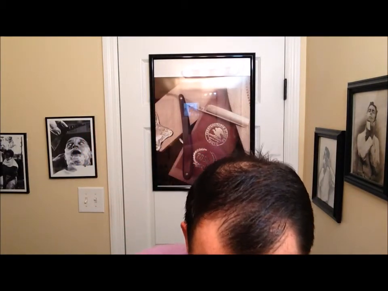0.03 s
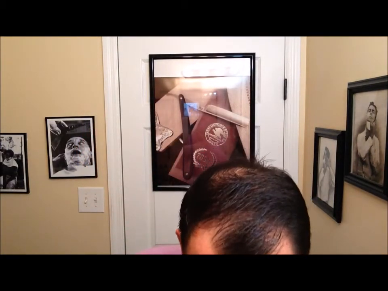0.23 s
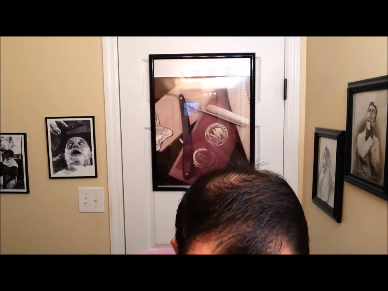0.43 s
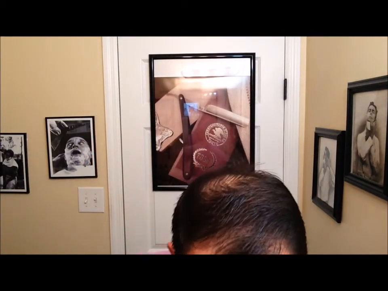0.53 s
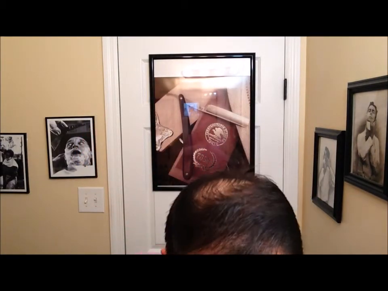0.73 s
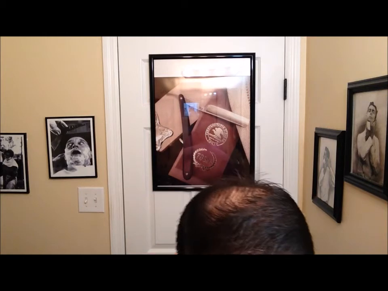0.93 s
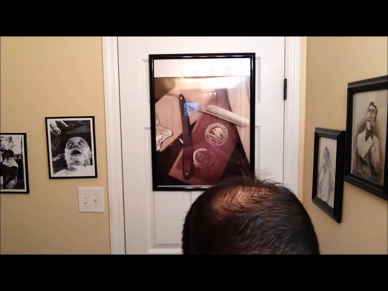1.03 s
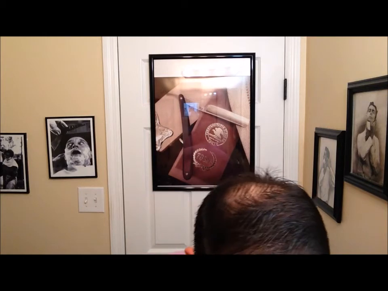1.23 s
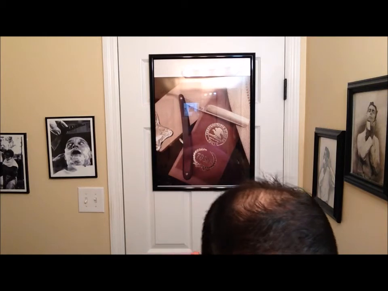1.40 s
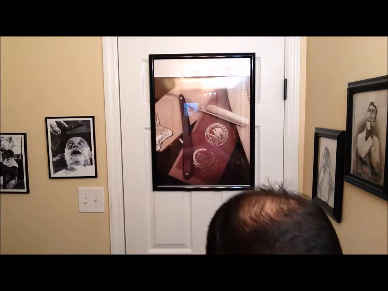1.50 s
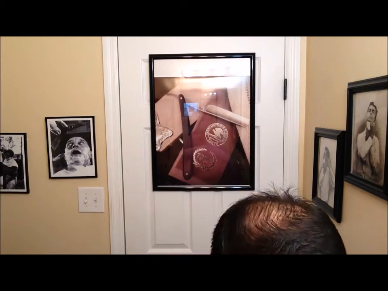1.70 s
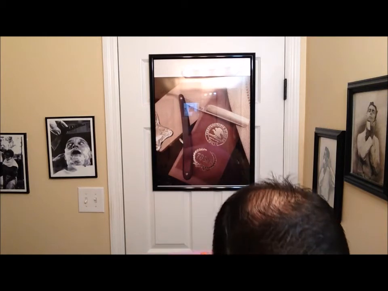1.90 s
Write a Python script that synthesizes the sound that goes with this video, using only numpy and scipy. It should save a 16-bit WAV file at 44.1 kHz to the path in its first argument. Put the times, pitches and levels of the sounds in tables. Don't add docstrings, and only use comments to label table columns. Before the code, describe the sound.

Hard shaving gear knocks at a bathroom sink, a mug set down, razor clinking, water drips

```python
import sys
import numpy as np
from scipy import signal
from scipy.fft import rfft, irfft, next_fast_len
from scipy.io import wavfile
from scipy.ndimage import uniform_filter1d, map_coordinates

SR = 44100
rng = np.random.default_rng(int(sys.argv[2]) if len(sys.argv) > 2 else 0)


def log_audio(samples):
    frames = np.atleast_2d(samples).T
    limited = np.clip(frames, -1, 1)
    pcm = np.round(limited * 32767).astype(np.int16)
    wavfile.write(sys.argv[1], SR, pcm)


def ratio(d):
    e = np.asarray(d, float) / 20
    return 10 ** e


N = 85995

# pitch_hz, t60_s
ROOM = [(100, 0.34), (400, 0.51), (1000, 0.5), (2500, 0.37), (5000, 0.34), (15000, 0.24)]


def unit(x):
    return x / np.sqrt(np.mean(x ** 2) + 1e-20)


def along(points, hz):
    f, v = np.transpose(points)
    return np.interp(np.log(hz + 1), np.log(f + 1), v)


def filtered(x, response):
    m = next_fast_len(len(x) + SR // 4)
    return irfft(rfft(x, m) * response(np.fft.rfftfreq(m, 1 / SR)), m)[:len(x)]


def coloured_noise(colour, n):
    return unit(filtered(rng.standard_normal(n), lambda hz: ratio(along(colour, hz))))


def wander(knots, rate_hz):
    return map_coordinates(rng.standard_normal(knots), [np.arange(N) * rate_hz / SR])


def envelope(points):
    s, db = np.transpose(points)
    return ratio(np.interp(np.arange(N) / SR, s, db))


def add(track, s, sound):
    part = track[round(s * SR):][:len(sound)]
    part += sound[:len(part)]


def tail(colour, hold_s=0, build_cycles=0):
    noise = coloured_noise(colour, SR)
    hz, t, z = signal.stft(noise, SR, nperseg=256)
    fall = ratio(-60 * np.maximum(t - hold_s, 0) / along(ROOM, hz)[:, None])
    grow = 1 - np.exp(-np.outer(hz + 50, t + 0.0052) / (build_cycles + 1e-6))
    return signal.istft(z * fall * grow, SR, nperseg=256)[1][:SR]


def roomy(sound, room_db):
    answer = tail([(100, 0)])
    answer = answer / np.linalg.norm(answer)
    return sound + ratio(room_db) * signal.fftconvolve(sound, answer)[:len(sound)]


def ring(modes, build_cycles=2):
    scatter_cycles, scatter_rate_hz, scatter_per_hz = 75, 8, .038
    t, out = np.arange(SR) / SR, 0
    for hz, db, t60_s in modes:
        clear = np.exp(-t * hz / scatter_cycles)
        position = t * (scatter_rate_hz + scatter_per_hz * hz)
        a, b = (map_coordinates(knots, [position]) for knots in rng.standard_normal((2, 500)))
        scattered = np.sqrt((1 - clear ** 2) / 2) * (a + 1j * b)
        line = np.imag(np.exp(2j * np.pi * hz * t) * (clear + scattered))
        decay = ratio(db - 60 * t / min(t60_s, along(ROOM, hz)))
        out = out + decay * (1 - np.exp(-t * hz / build_cycles)) * line
    return out


def floor():
    # pitch_hz, level_db_per_hz
    floor_colour = [(40, -27.5), (100, 1), (180, -0.5), (400, -6.5), (1000, -11), (2500, -15.5),
                    (6000, -15), (15500, -15)]
    return ratio(-69.5) * coloured_noise(floor_colour, N)


def trickle():
    # start_s, flow_db
    flow = [(0, -70.5), (.2, -68), (.42, -70.5), (.5, -64), (.6, -70.5), (.68, -74), (.9, -72.5),
            (1.562, -82.5), (1.598, -62.5), (1.66, -54.5), (1.69, -64), (1.95, -90)]
    # pitch_hz, level_db_per_hz
    fizz = [(1500, -38), (3000, -10), (5000, -8), (8000, -11.5), (12000, -8), (15500, -15)]
    spikes = ratio(1.5 * wander(600, 250)) * rng.standard_normal(N)
    return envelope(flow) * unit(filtered(spikes, lambda hz: ratio(along(fizz, hz))))


def drops():
    # start_s, level_db, pitch_hz, life_cycles
    plinks = [(.089, -39, 3850, 6), (.1754, -38, 9770, 8), (.1765, -51, 13400, 5), (.5, -53, 9900, 14),
              (.4995, -55.5, 12600, 4), (.554, -57, 7400, 6), (.584, -54, 7600, 3), (.595, -57, 7400, 4),
              (.877, -48, 12800, 8), (.948, -50, 11300, 8), (1.092, -64, 4800, 8), (1.1708, -48, 6670, 4),
              (1.796, -45.5, 2680, 13), (1.885, -55, 2600, 10), (1.925, -60, 2650, 12),
              (1.944, -56, 2450, 14), (1.942, -55, 3680, 25), (1.935, -61, 3050, 25),
              (1.855, -62, 4330, 25)]
    glide, room_db = .04, -1
    out, t = np.zeros(N), np.arange(SR // 3) / SR
    for s, db, hz, life_cycles in plinks:
        u = t * hz / life_cycles
        phase = 2 * np.pi * hz * t * (1 + glide * np.minimum(u, 2))
        tone = np.sin(phase) * u * np.exp(1 - u * 3) * 3
        add(out, s, ratio(db) * roomy(tone, room_db))
    return out


def chain():
    # pitch_hz, level_db, t60_s
    chink = [(8330, -67, 0.08), (9970, -63.5, 0.11), (11130, -61, 0.094)]
    out = np.zeros(N)
    add(out, 1.814, roomy(ring(chink), 3))
    return out


def slide():
    # start_s, pressure_db
    pressure = [(0, -47), (.08, -50), (0.189, -52), (0.211, -55), (0.237, -39), (.3, -100), (1.7, -100),
                (1.78, -88), (1.85, -62.5), (1.95, -64.5)]
    # pitch_hz, width_hz, level_db
    resonances = [(255, 35, 2.5), (602, 120, -4.5), (887, 7.1, 4.5), (1320, 70, -1.5), (1966, 41, -17.5),
                  (2390, 160, -11), (3000, 45, -34.5), (3590, 34, -5), (3870, 150, -17), (4630, 170, -20.5)]
    # pitch_hz, level_db_per_hz
    bed_colour = [(60, -56.5), (150, -32.5), (250, -16), (600, 0), (1500, -13), (4000, -18), (6000, -31.5),
                  (15500, -41)]
    cut_hz, grit_db, bed_db = 210, 1.7, -4.5

    def body(f):
        total = 0
        for k, (centre_hz, width_hz, db) in enumerate(resonances):
            damping = 1j * f * width_hz
            total = total + (-1) ** k * ratio(db) * damping / (centre_hz * centre_hz - f * f + damping)
        return f ** 4 / (f ** 4 + cut_hz ** 4) * total

    grit = ratio(grit_db * wander(200, 70)) * rng.standard_normal(N)
    bed = coloured_noise(bed_colour, N)
    return envelope(pressure) * (unit(filtered(grit, body)) + ratio(bed_db) * bed)


def rocking():
    # middle_s, level_db, pitch_hz, length_s
    touches = [(0.088, -46, 1304, 0.038), (0.255, -26, 421.4, 0.053), (0.285, -25.5, 957, 0.044),
               (.36, -36, 1530, .05), (.36, -35, 498.4, 0.052), (0.419, -38, 1345, .03),
               (.222, -48, 186, .04), (.81, -55.5, 2817, .02), (.232, -23.5, 1465, .015),
               (1.265, -55.5, 1506, 0.017), (1.269, -59.5, 1850, 0.021), (1.4, -61.5, 171, 0.11),
               (1.48, -60.5, 242, 0.0297), (1.477, -67.5, 1260, 0.022), (1.594, -50, 1244, 0.016),
               (1.61, -32, 1065, 0.0147), (1.655, -35.5, 102, .06), (1.76, -41.5, 230, 0.065),
               (0.325, -34, 427, 0.028), (.4, -40.5, 322, 0.043), (0.628, -65, 224, 0.12),
               (1.317, -48, 292.8, 0.058), (1.614, -41, 3137, .02), (1.624, -37.5, 3720, 0.027),
               (1.923, -52, 236, 0.076), (0.801, -38.5, 397, .025), (0.867, -50.5, 328, .05),
               (0.935, -53.5, 514, 0.023), (0.94, -60, 1022, 0.018), (1.271, -48, 417.5, .03),
               (1.305, -47, 414, .025), (1.337, -56, 709, 0.027), (1.35, -54.5, 462, 0.0253),
               (1.51, -58, 398, 0.034), (1.632, -42.5, 503, 0.028), (1.655, -36.5, 1273, .02),
               (1.683, -35, 718, 0.022), (1.85, -54, 514, 0.033), (1.866, -50.5, 287, .03),
               (1.936, -50, 406, .035)]
    # middle_s, level_db, pitch_hz, length_s
    razor_beats = [(.718, -31, 305, .04), (.746, -28.5, 308, .032), (.775, -38, 300, .035)]
    out, t = np.zeros(N), np.arange(SR // 10) / SR
    for s, db, hz, length_s in [*touches, *razor_beats]:
        swell = np.sin(np.pi * np.minimum(t / length_s, 1)) ** 2
        add(out, s - length_s / 2, ratio(db) * swell * np.sin(2 * np.pi * hz * t))
    return roomy(out, -10)


def knocks():
    knock_s = [
        .2287,
        .6896,
        1.136,
        1.2605,
        1.468,
        1.587,
        1.6055,
    ]
    # level_db, rise_s, hold_s, ring_over_thud_db, build_cycles (to fill the room)
    contacts = [(-23, 0.00046, 0.04, -6, 0.54), (-34.5, 0.00064, 0.00525, -1.5, 6.7),
                (-63, 0.0092, 0.05, -17, 1.4), (-47.5, 0.0022, 0.01, 2, 3.9), (-59, 0.0031, 0.009, 6, 2.4),
                (-39, 0.017, 0.024, 4.5, 1.1), (-30.5, 0.0017, 0.035, -3, 3.6)]
    cracks_db = [-31, 6.5, -34, -22, -22, -28, -29]
    # pitch_hz, level_db_per_hz
    mug = [(60, -36), (200, -2.5), (450, -1), (1000, -2), (2600, -13.5), (3300, -27.5), (4600, -41.5),
           (15500, -56)]
    razor = [(60, -28), (150, -3.5), (310, -1.5), (700, -6), (1300, -10), (2200, -14), (5000, -20.5),
             (15500, -24.5)]
    nudge = [(60, 2), (150, 10), (350, 3), (700, -45), (1500, -43), (15000, -59)]
    soft = [(60, -1.5), (170, 1), (350, 7), (800, -2), (1900, -27), (2200, -23), (15000, -57)]
    tap = [(60, -5), (230, -2), (450, -11), (800, -31), (1300, -16.5), (1800, -55), (15000, -51)]
    graze = [(150, -9.5), (350, 4.5), (1300, -21), (3000, -21.5), (8000, -42)]
    bowl = [(60, -17), (110, -2.5), (466, -3.5), (900, -11.5), (2250, -19.5), (3300, -13.5), (4500, -27),
            (15500, -48)]
    # pitch_hz, level_db, t60_s
    mug_ring = [(188, -7.5, 0.34), (425, 2, 0.25), (506, 2, .3), (748, 1, 0.32), (964, 7, 0.2),
                (1090, -2, .19), (1570, 6, 0.09), (1415, 9, 0.12), (1960, -4, 0.25), (2240, 5, 0.092),
                (2560, 1, 0.16), (5400, -11, 0.09), (3700, -21.5, 0.3), (635, -6, .45)]
    razor_ring = [(291, 5, .22), (326, 4, .36), (445, -3, .4), (501, 0, .25), (791, -6, .25),
                  (1211, -6, .22), (1450, -3, .12), (2200, -4, .1), (2853, -1, .24), (3634, -7, .2),
                  (4900, -13, .2), (7050, -12, .2), (7260, -6, .1)]
    soft_ring = [(168, -9.5, 0.5), (287, -5.5, 0.5), (400.3, -7, 0.21), (430, -12, 0.23), (690, -6.5, 0.2),
                 (1060, -13.5, 0.16), (1456, -2.5, 0.044), (1660, -11, 0.14), (1850, -3, 0.033)]
    tap_ring = [(230, 10, 0.23), (389, -26, 0.57), (1260, -10.5, 0.13)]
    graze_ring = [(1244, 3.5, 0.047), (8140, -15.5, 0.18)]
    bowl_ring = [(110.8, -1, 0.22), (225.9, -1.5, 0.56), (460.4, 4, 0.27), (620, -2, 0.24),
                 (708, -5.5, 0.6), (1027, -1.5, 0.21), (1183, 2, 0.076), (1705, -8.5, 0.37),
                 (2840, -13, 0.34), (3085, -0.5, 0.22), (3200, -1.5, 0.29), (3316, -6, 0.27),
                 (3760, -4, 0.32), (5300, -11, 0.3)]
    kinds = [(mug, mug_ring), (razor, razor_ring), (nudge, tap_ring), (soft, soft_ring), (tap, tap_ring),
             (graze, graze_ring), (bowl, bowl_ring)]
    crack_s, ring_room_db = .0022, -5.5
    out, t = np.zeros(N), np.arange(SR) / SR
    for s, contact, (colour, modes), crack_db in zip(knock_s, contacts, kinds, cracks_db):
        db, rise_s, hold_s, ring_db, build_cycles = contact
        crack = ratio(crack_db) * np.exp(-t / crack_s) * np.diff(rng.standard_normal(SR + 1))
        thud = tail(colour, hold_s, build_cycles)
        ringing = ratio(ring_db) * roomy(ring(modes, build_cycles), ring_room_db)
        add(out, s, ratio(db) * (1 - np.exp(-t / rise_s)) * (crack + thud + ringing))
    return out


def scene():
    return (floor() + trickle() + drops() + chain() + slide() + rocking() + knocks())[None]


def starve(x):
    # middle_s, above_hz, weakest_kept_db
    starved = [(.036, 5200, -24), (.209, 1800, -24), (.419, 3300, -22), (.461, 2800, -31),
               (.612, 1700, -31), (1.679, 5800, -16), (1.827, 4000, -26)]
    n, x = round(.025 * SR), x.copy()
    window, hz = np.sin(np.pi * (np.arange(n) + .5) / n), np.fft.rfftfreq(n, 1 / SR)
    for s, above_hz, keep_db in starved:
        part = x[round(s * SR) - n // 2:][:n]
        z = rfft(part * window)
        weak = uniform_filter1d(abs(z) ** 2, size=9) < ratio(2 * keep_db)
        part -= window * irfft(z * weak * (hz > above_hz), n)
    return x


def microphone_band(hz):
    low_cut_hz, top_hz = 85, 15450
    low_cut = (1j * hz / (low_cut_hz + 1j * hz)) ** 2 / np.sqrt(1 + (40 / (hz + 1)) ** 4)
    return low_cut / (1 + (hz / top_hz) ** 90)


def roll_off(x):
    return signal.sosfilt(signal.butter(12, 16390, fs=SR, output="sos"), x)


def record(dry):
    mix = starve(filtered(dry[0], microphone_band))[None]
    return roll_off(mix)


dry = scene()
out = record(dry)
log_audio(out)
```